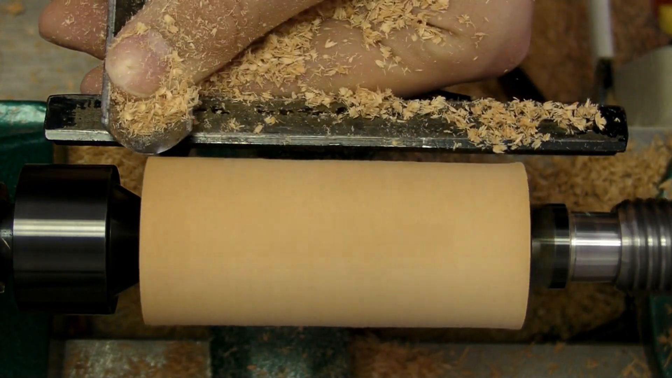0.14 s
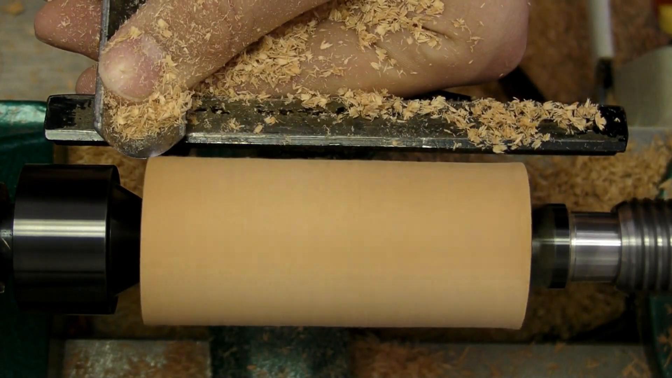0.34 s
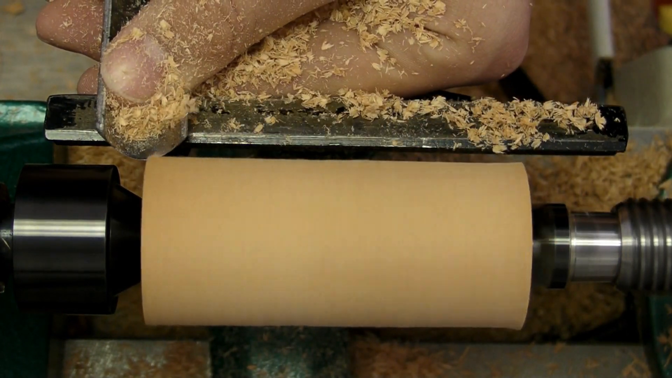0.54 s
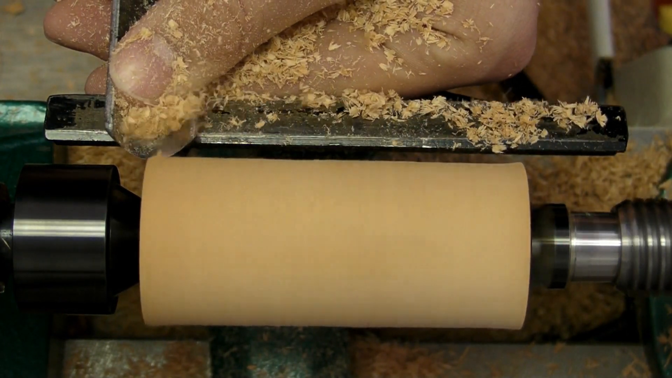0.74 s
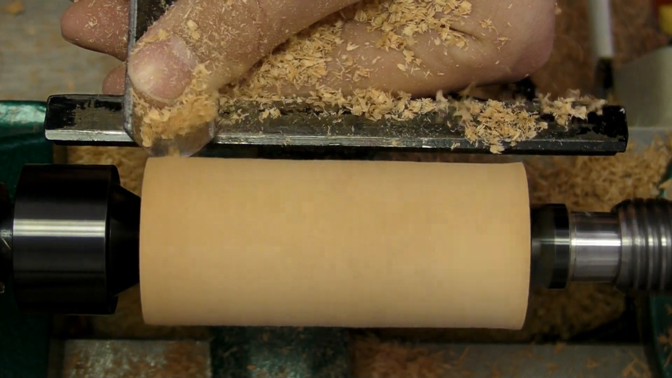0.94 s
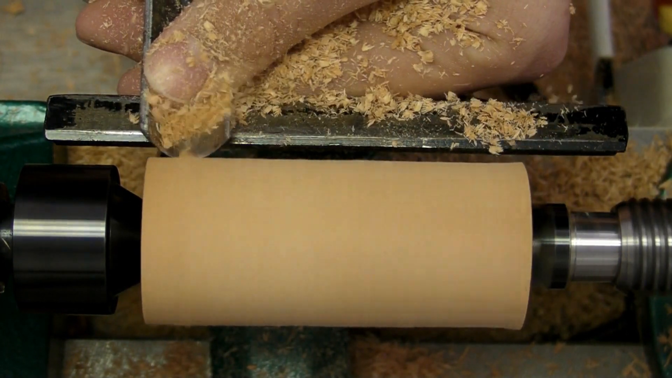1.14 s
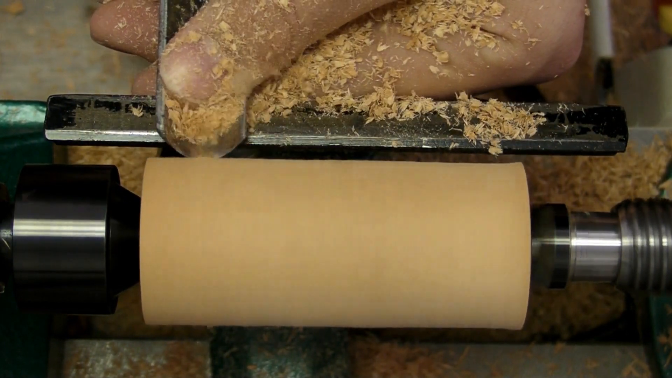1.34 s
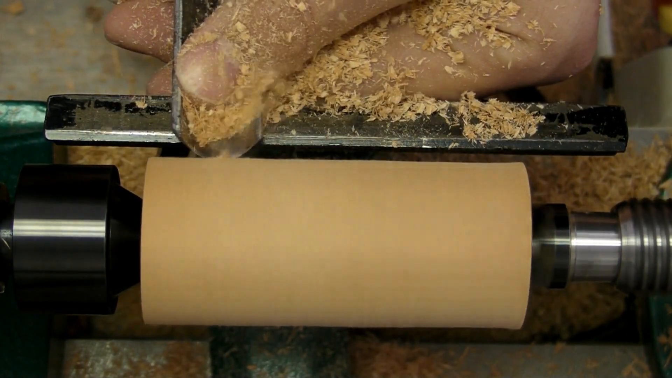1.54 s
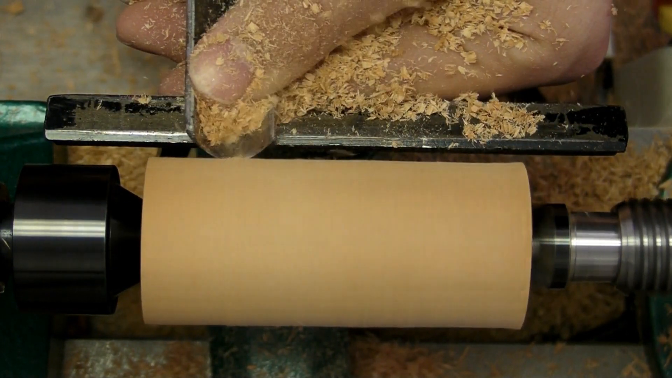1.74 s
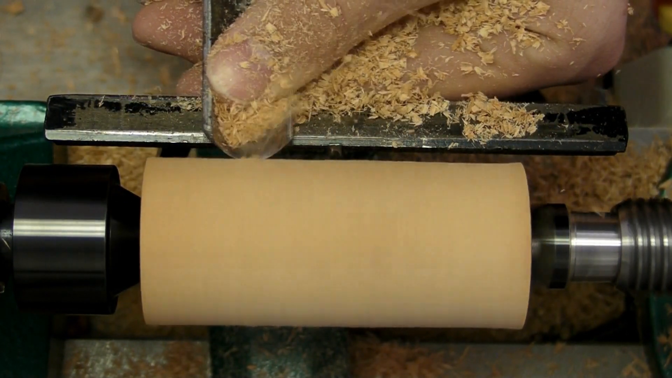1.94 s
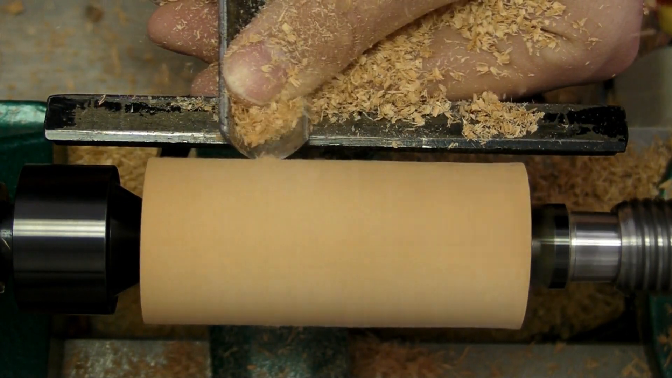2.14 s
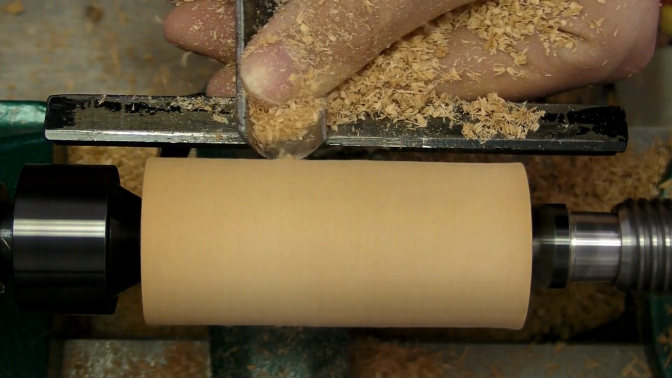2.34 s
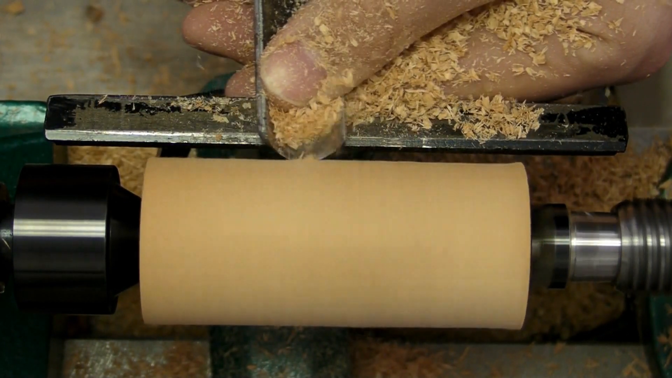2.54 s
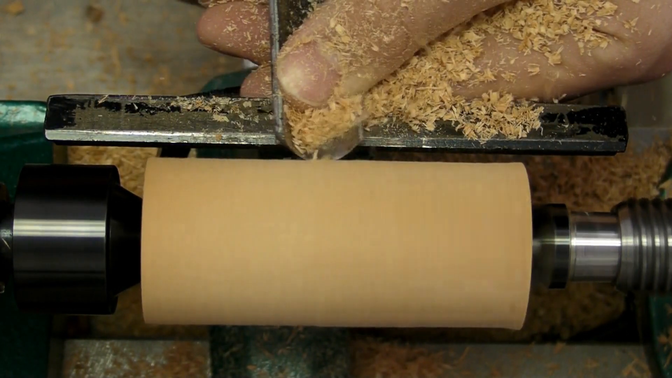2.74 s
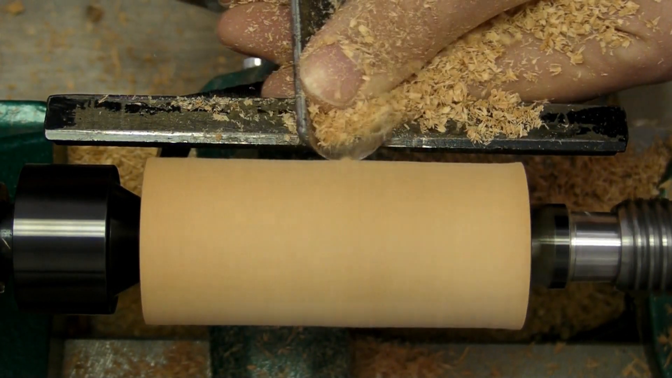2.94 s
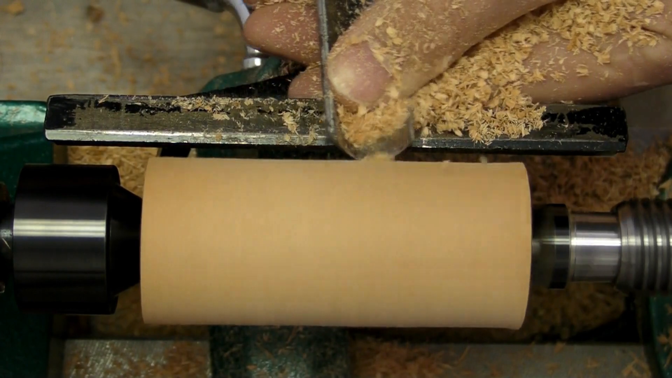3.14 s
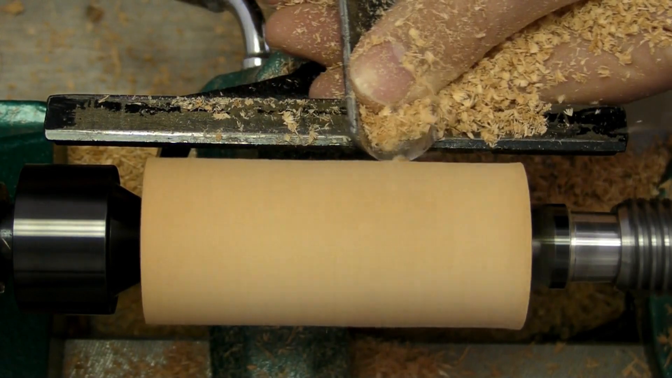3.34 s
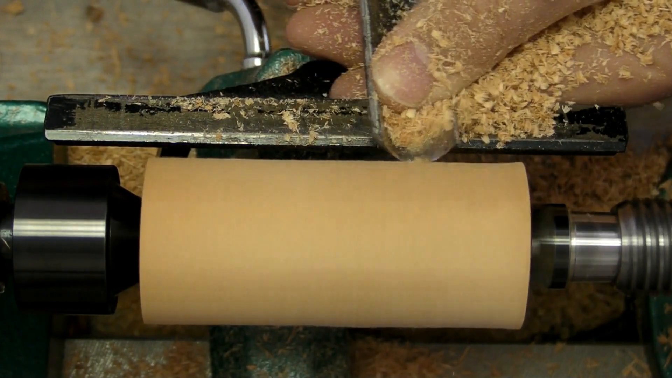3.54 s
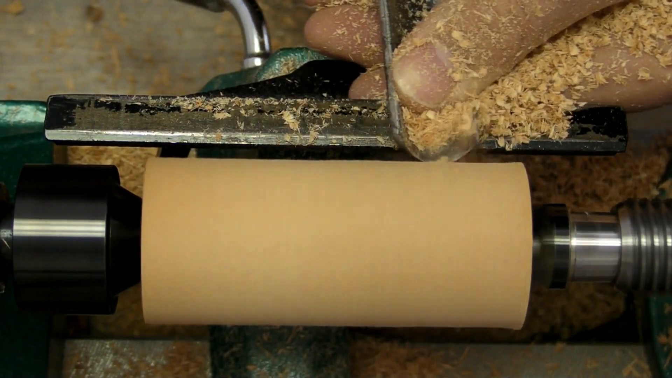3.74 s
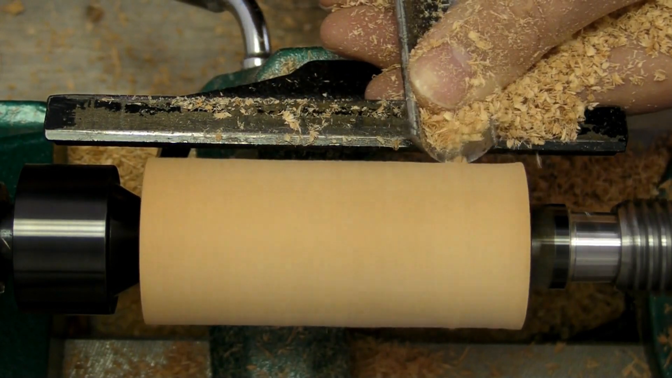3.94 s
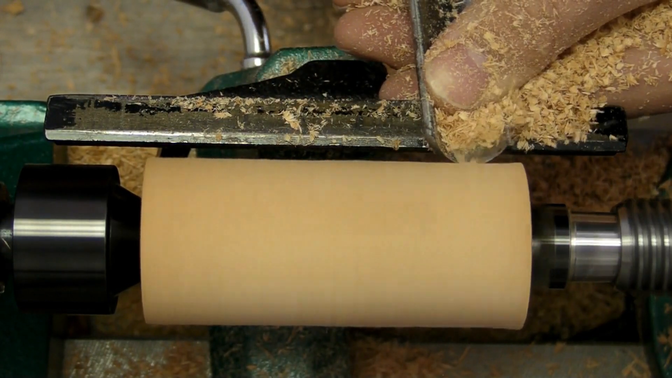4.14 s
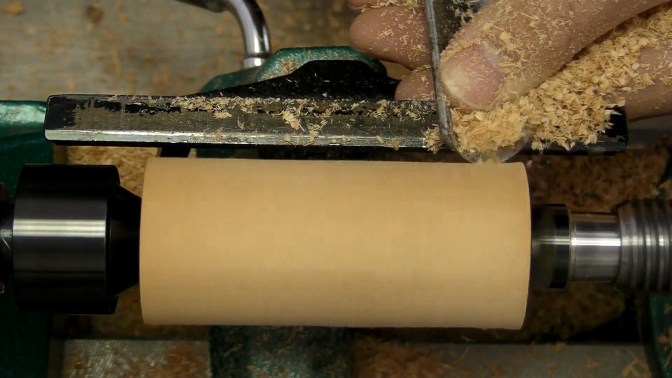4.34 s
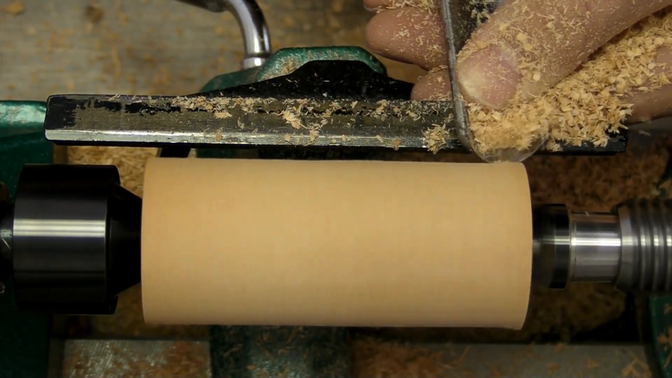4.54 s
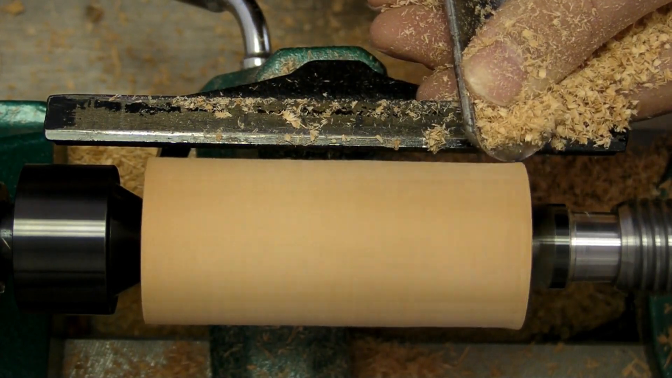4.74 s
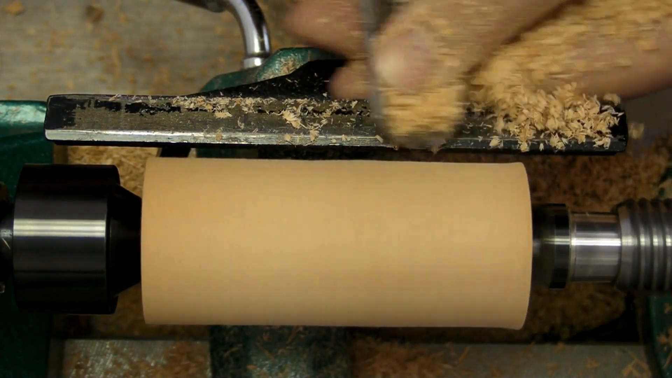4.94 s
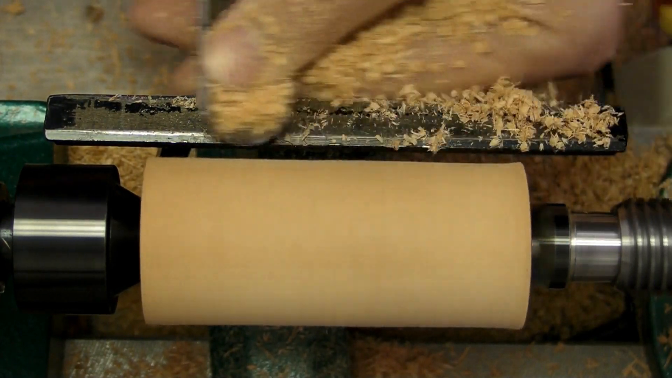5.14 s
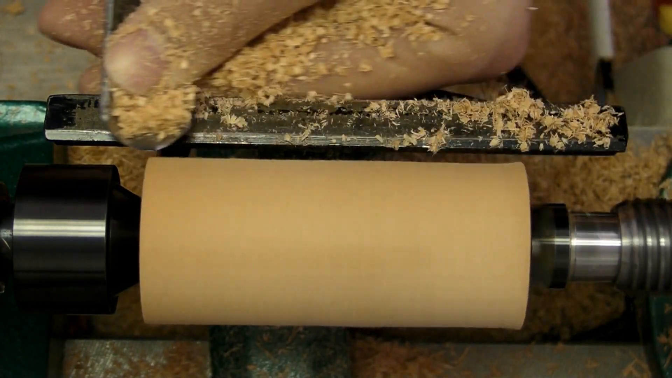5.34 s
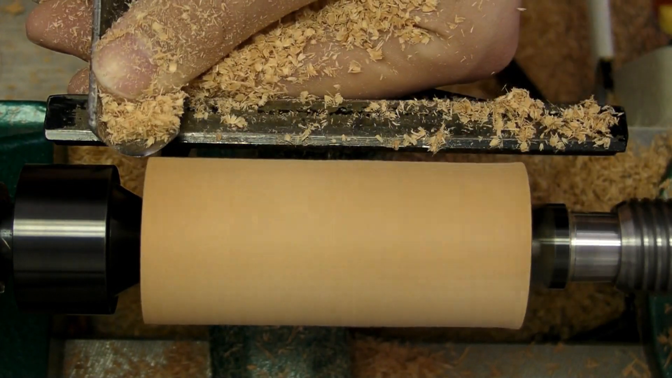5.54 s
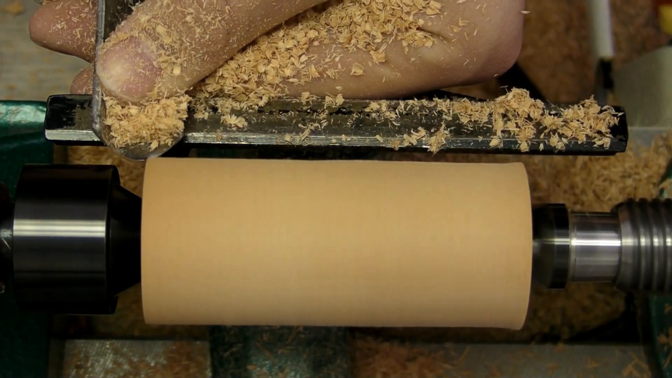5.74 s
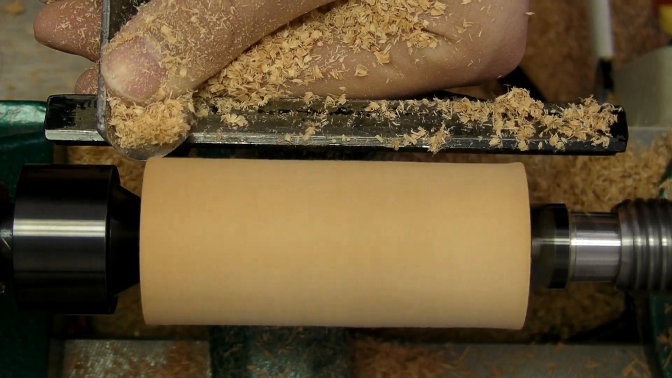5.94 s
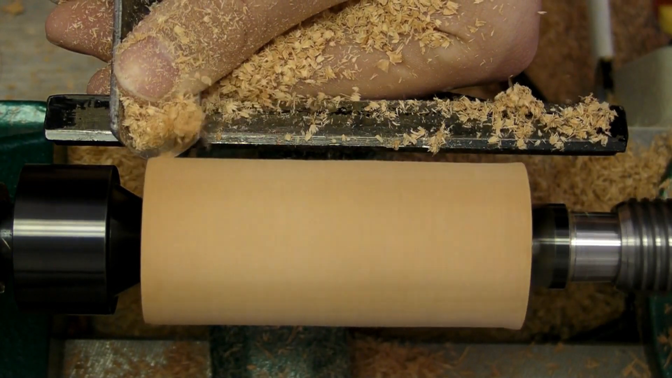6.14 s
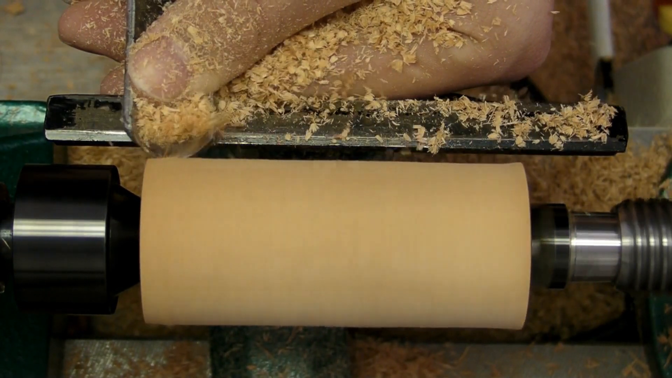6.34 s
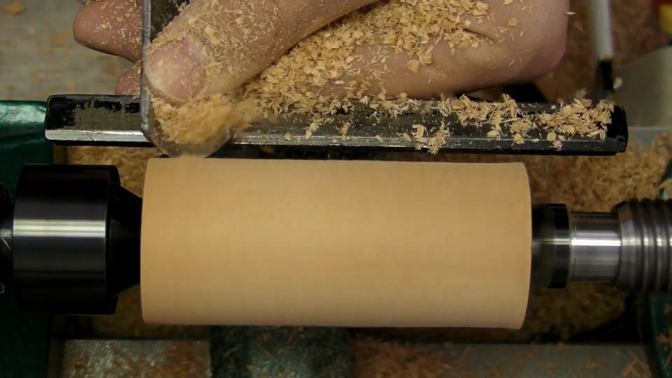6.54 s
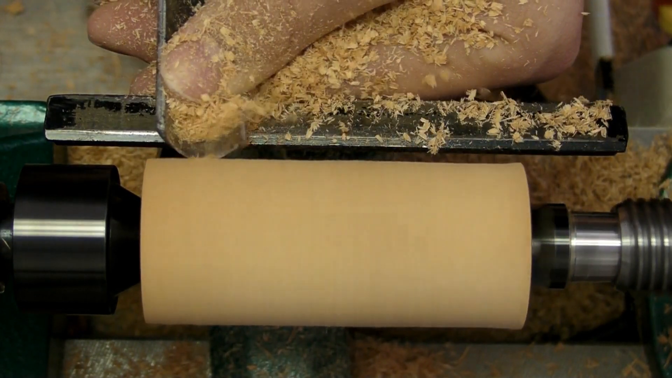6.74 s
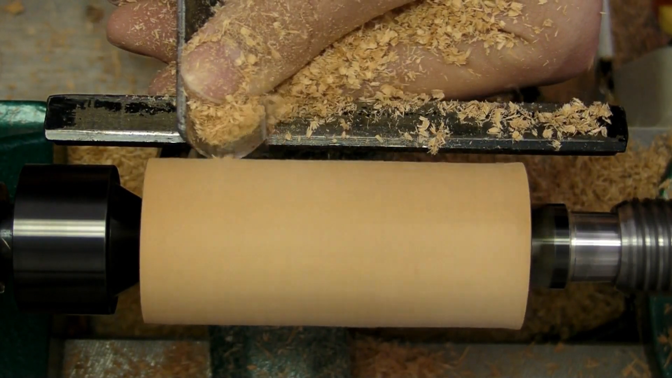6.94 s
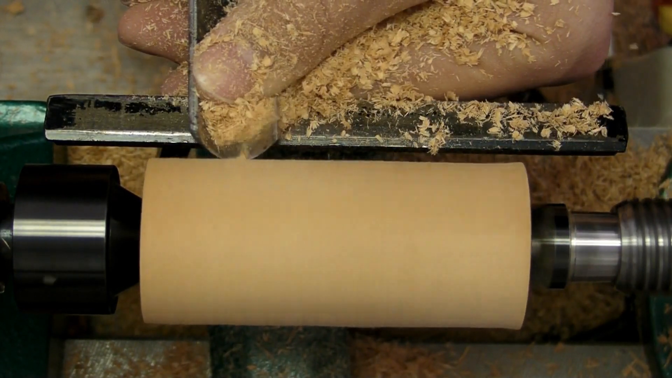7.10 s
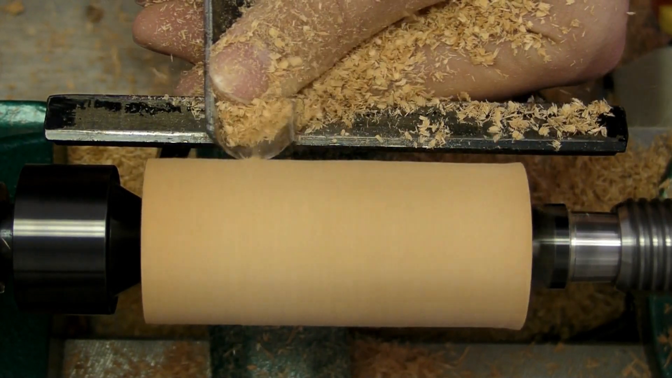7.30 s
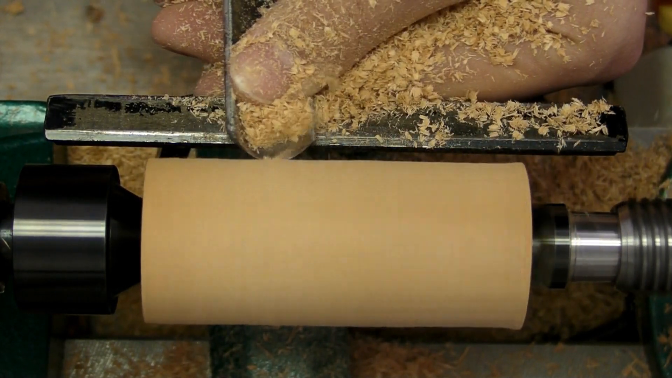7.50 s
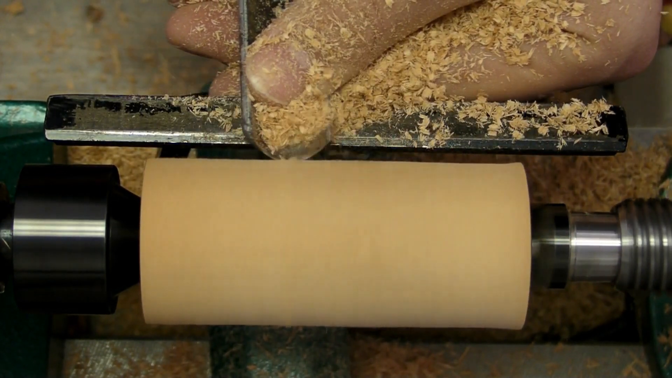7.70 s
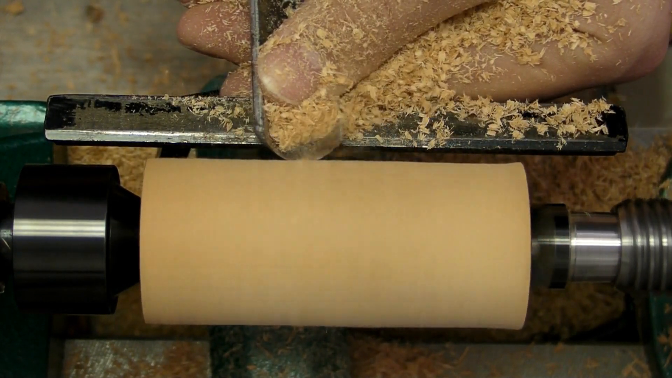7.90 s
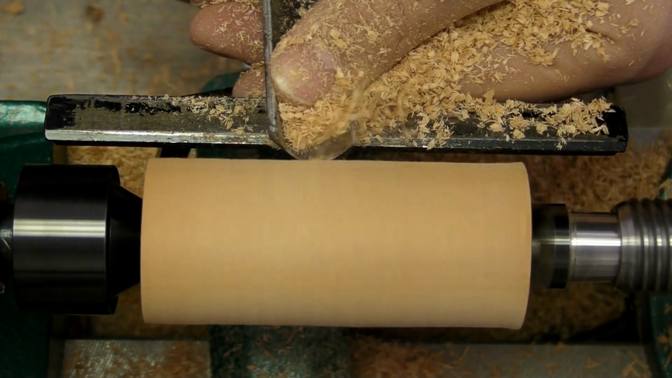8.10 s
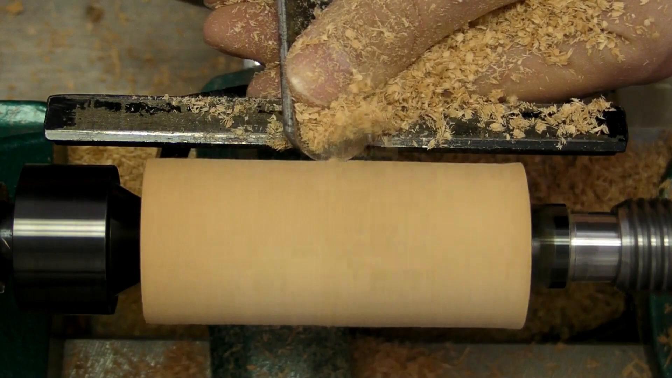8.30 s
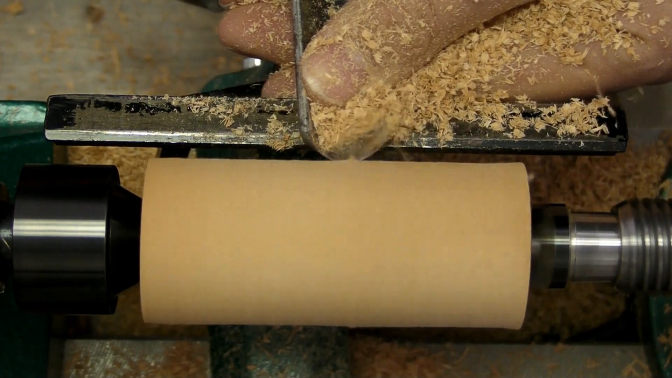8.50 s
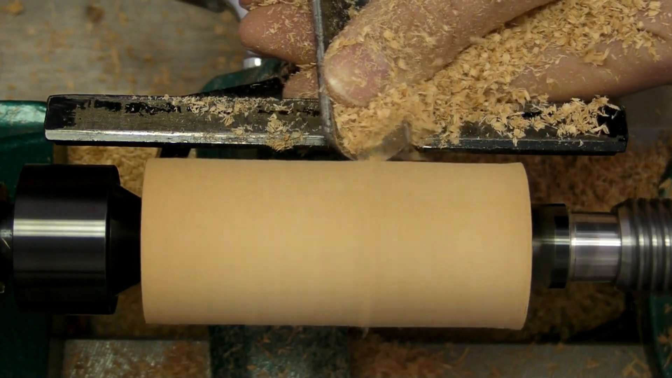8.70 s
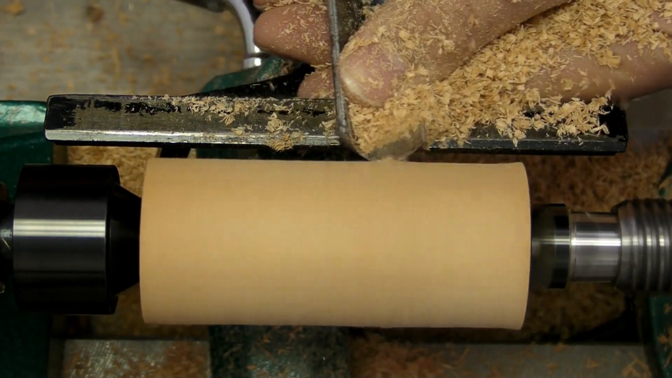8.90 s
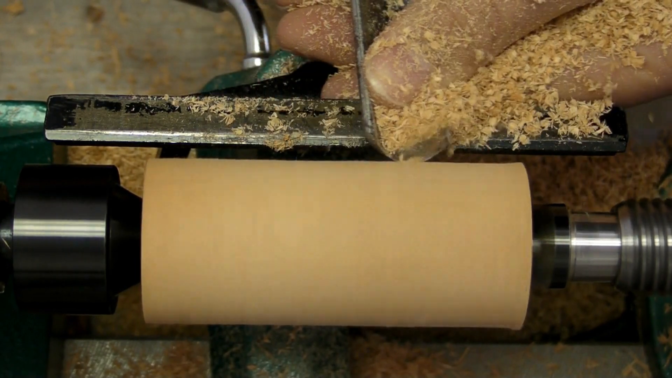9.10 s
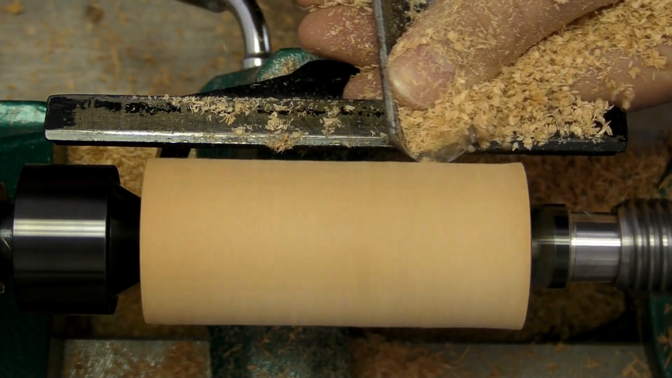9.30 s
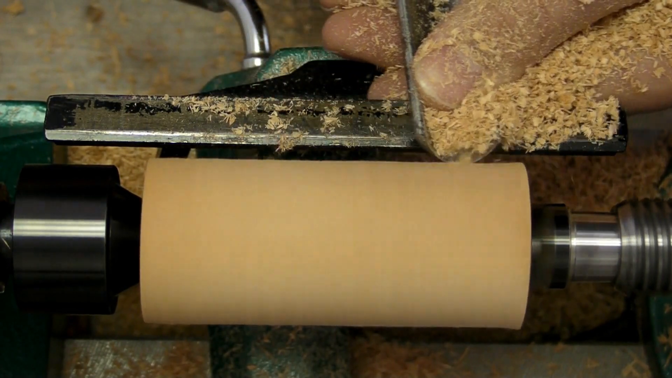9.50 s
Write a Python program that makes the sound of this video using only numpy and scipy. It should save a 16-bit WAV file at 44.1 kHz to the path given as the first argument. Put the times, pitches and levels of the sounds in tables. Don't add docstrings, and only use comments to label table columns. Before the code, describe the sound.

At first only a small lathe runs: a low-level, unsteady motor hum with airy wash and light housing rattle, throbbing about ten times a second. At 0.5 s a gouge abruptly bites the spinning wooden blank, and a loud, dense rasp takes over, bright hiss mixed with gritty crackle and hard metallic buzzing, fluttering about eighteen times a second with the turns. The spin sags slightly at the bite and recovers; the timbre wavers and shifts as the tool moves along. At about 4.7 s it lifts quickly, leaving the quiet motor. Around 5.1 s a tight cluster of steel knocks sounds on the rest, the last one hardest. At about 5.9 s the edge bites again with a stronger jolt, and the rasp continues to the end, around 9.6 s, uninterrupted. Close stereo microphone, slightly overloaded, short workshop echo.

```python
import sys
import numpy as np
from scipy import signal
from scipy.fft import rfft, irfft
from scipy.io import wavfile
from scipy.ndimage import uniform_filter1d, map_coordinates

SR = 44100
rng = np.random.default_rng(int(sys.argv[2]) if len(sys.argv) > 2 else 0)


def dump_mix(stems):
    frames = np.atleast_2d(stems).T
    limited = np.clip(frames, -1, 1)
    pcm = np.round(limited * 32767).astype(np.int16)
    wavfile.write(sys.argv[1], SR, pcm)


def invert_db(level):
    return 10 ** (np.asarray(level, dtype=float) / 20)


N = 426006
TIME = np.arange(N) / SR
HZ = np.fft.rfftfreq(8192, 1 / SR)


def evened(x):
    return x / np.sqrt(np.mean(x ** 2) + 1e-20)


def read(points, hz):
    f, value = np.transpose(points)
    return np.interp(np.log(hz + 1), np.log(f + 1), value)


def curve(points):
    return np.interp(TIME, *np.transpose(points))


def causal(gain):
    cepstrum = irfft(np.log(gain + 1e-6))
    cepstrum[1:len(gain) - 1] *= 2
    cepstrum[len(gain):] = 0
    return irfft(np.exp(rfft(cepstrum)))[:len(gain)]


def body(modes, broad_db):
    power = invert_db(2 * broad_db)
    for hz, width, db in modes:
        detuning = 2 * (HZ ** 2 - hz ** 2) / (2 * HZ + 1) / width
        power = power + invert_db(2 * db) / (1 + detuning ** 2) ** 1.57
    return np.sqrt(power)


def flicker(hz):
    steps = rng.standard_normal(int(N / SR * 2 * hz) + 2)
    smooth = signal.resample(steps, 16 * len(steps))
    return np.interp(TIME, np.linspace(0, N / SR, len(smooth)), evened(smooth))


def widen(mid, spread):
    taps = rng.choice([-1., 1.], (2, 1200)) * np.exp(-np.arange(1200) / 280.0)
    tone = causal(invert_db(read(spread, HZ)))
    smear = signal.oaconvolve(taps / np.linalg.norm(taps[0]), tone[None], axes=1)
    first, second = signal.oaconvolve(mid[None], smear, axes=1)[:, :N]
    angle = 2 * np.pi * 1.5 * TIME + 2.0 * flicker(12.0)
    side = first * np.cos(angle) + second * np.sin(angle)
    return np.array([invert_db(-0.2) * mid + side, invert_db(0.15) * mid - side])


# (frequency [Hz], level per Hz [dB])
MOTOR_WASH = [(15, -38), (25, -80), (64, -9), (277, -2.5), (301, -10), (427, -1), (463, -11), (624, -16),
              (695, -14), (911, -1), (988, -10.5), (2910, -8), (16000, -23)]
# (frequency [Hz], width [Hz], level [dB])
HOUSING = [(485, 160, -4.5), (952, 28, 0.5), (1174, 99, -5), (1890, 22, -3), (2280, 55, -2.5),
           (2510, 45, -5), (2930, 98, -3.5), (3650, 49, -4.5), (4410, 70, -16), (7600, 190, -16)]
# (frequency [Hz], level [dB])
HUM = [(312.2, -57.5), (393.0, -58), (463.0, -53.5), (619.1, -58), (775.2, -60), (893.6, -54), (931.3, -53),
       (1055, -69), (1200, -63)]


def motor():
    belt = 2 * np.pi * 9.65 * (TIME - 5.505)
    belt_db = 2.5 * np.cos(belt) + 2.0 * np.cos(2 * belt) + 1.2 * flicker(40)
    noise = rng.standard_normal(N)
    wash = evened(signal.oaconvolve(noise, causal(invert_db(read(MOTOR_WASH, HZ))))[:N])
    blows = rng.standard_normal(N) * invert_db(0.12 * belt_db)
    rattle = evened(signal.oaconvolve(blows, causal(body(HOUSING, -45 + 0 * HZ)))[:N])
    drift = np.cumsum(1 + 0.00068 * flicker(2.7)) / SR
    tones = np.zeros(N)
    for hz, db in HUM:
        level = invert_db(db + belt_db * (hz > 850) + 1.6 * flicker(23))
        tones += level * np.sqrt(2) * np.sin(2 * np.pi * (hz * drift + rng.random()))
    return invert_db(-41.5) * (invert_db(-2.5) * wash + invert_db(-5.0) * rattle) + tones


# (frequency [Hz], time to fall by 60 dB [s])
SHOP = [(200, 0.54), (1000, 0.56), (4000, 0.37), (12000, 0.11)]


def shop(x):
    taps = np.zeros((2, SR // 2))
    at = np.arange(300, SR // 2 - 20, 20) + rng.integers(0, 20, (2, (SR // 2 - 301) // 20))
    np.put_along_axis(taps, at, rng.choice([-1., 1.], at.shape), 1)
    hz, t, z = signal.stft(taps, SR, nperseg=256)
    tail = signal.istft(z * invert_db(-60 * t / read(SHOP, hz)[:, None]), SR, nperseg=256)[1]
    return signal.oaconvolve(x[None], tail / np.linalg.norm(tail[0]), axes=1)[:, :N]


# (time [s], peak level [dB], pitch [Hz])
KNOCKS = [
    (5.0913, -23, 3470),
    (5.1143, -27, 3440),
    (5.1214, -25, 1250),
    (5.1322, -15.5, 3460),
]
# (frequency [Hz], level [dB], time to fall by 60 dB [s])
STEEL = [(1250, 6.5, 0.14), (2000, -4, .04), (2960, -6, .05), (3460, 6, .03), (3760, -8, .04)]


def knocks():
    out, t = np.zeros(N), np.arange(5000) / SR
    scrape_band = signal.butter(3, [1000, 3900], "band", fs=SR)
    for s, db, hz in KNOCKS:
        ring = 0
        for f, level, t60 in STEEL:
            off_pitch_db = 4.3 * abs(np.log2(f / hz))
            ring = ring + invert_db(level - off_pitch_db - 60 * t / t60) * np.sin(2 * np.pi * f * t)
        scratch = rng.standard_normal(len(t)) * (np.exp(-t / 0.0023) + 0.38 * np.exp(-t / 0.022))
        scratch = signal.lfilter(*scrape_band, scratch)
        out[round(s * SR):][:len(t)] += invert_db(db - 3.0) * (ring / abs(ring).max() + 0.81 * scratch)
    return out


# (edge touches [s], edge bites [s], gouge lifts or would lift [s], jolt of the bite [dB])
PASSES = [
    (0.476, 0.501, 4.735, 5),
    (5.847, 5.875, 10.6, 8),
]


def travel():
    _, bite, lift, *_ = np.transpose(PASSES)
    return np.interp(TIME, np.c_[bite, lift].ravel(), np.tile([0, 1], len(bite)))


def contact_db(lag_s, ring_db_per_s, jolt_share):
    jolt_s = .004
    out = np.full(N, -90.)
    for touch, bite, lift, jolt_db in PASSES:
        times = [touch - .018, touch - .002, touch, bite - 2 * jolt_s, bite]
        graze = np.interp(TIME - lag_s, times, [-45, -33, -16, -7, 0], left=-90)
        jolt = jolt_share * jolt_db * np.exp(-((TIME - bite) / jolt_s) ** 2)
        out = np.maximum(out, graze + jolt - ring_db_per_s * np.maximum(TIME - lift, 0))
    return out


# (time [s], speed [turns/s])
SPINDLE = [(.5, 18.25), (.65, 18.1), (.92, 17.3), (1.35, 17.77), (1.75, 17.75), (2.5, 17.97), (3.1, 17.9),
           (4.75, 17.98), (5.87, 18.1), (6.22, 17.5), (6.5, 17.72), (7.0, 17.9), (7.6, 17.88), (8.0, 17.78),
           (8.7, 17.66), (9.1, 18.05)]


def spindle_turns():
    return -.245 + np.cumsum(curve(SPINDLE)) / SR


STATIONS = (0, .7, 1)
# (level [dB]), then (angle [turns])
OFF_CENTRE_DB = (1.3, 1.1, 2.8)
OFF_CENTRE_TURNS = (-.27, -.2, -.17)
# (level [dB]), then (angle [turns])
OVAL_DB = (1.6, .6, 1.1)
OVAL_TURNS = (.03, .25, .3)
FLATS_DB = (4, 1.5, 4)


def throb(turns, done):
    shape = (OFF_CENTRE_DB, OFF_CENTRE_TURNS, OVAL_DB, OVAL_TURNS, FLATS_DB)
    centre_db, centre_at, oval_db, oval_at, flats_db = (np.interp(done, STATIONS, c) for c in shape)
    centre = centre_db * np.cos(2 * np.pi * (turns + centre_at))
    oval = oval_db * np.cos(2 * np.pi * (2 * turns + oval_at))
    flats = np.cos(2 * np.pi * 4 * turns) + 0.57 * np.cos(2 * np.pi * (8 * turns - .45))
    return centre + oval + 0.61 * flats_db * flats


# (count [per turn], level [dB])
RIDGES = [(8, 11), (14, 11), (16, 3), (20, 6.5), (22, 12), (24, 2.5), (27, 6), (30, 7), (32, 8), (36, 8.5),
          (41, 6), (46, 2), (53, 5)]


def surface(turns):
    order = np.arange(513)
    strength_db = np.where(order % 2, -3.0, 0.) - 60 * (order > 130)
    rings = rng.standard_normal((60, 513)) + 1j * rng.standard_normal((60, 513))
    rings = rings * invert_db(strength_db)
    for count, db in RIDGES:
        phase = count ** 2 + .22 * np.cumsum(rng.standard_normal(60))
        rings[:, count] = .5 * rings[:, count] + invert_db(db) * np.exp(1j * phase)
    profile = irfft(rings, axis=1)
    profile = np.c_[profile, profile[:, :1]]
    return evened(map_coordinates(profile, [TIME * 3.5, turns % 1 * 1024], order=1))


# (time [s], edge hiss from its pressure [dB], slack that lets the gouge bounce [dB])
HAND = [(.5, -18, -4), (.8, -18, 5), (1.2, -19, 0), (1.47, -18.5, -3), (1.65, -18.6, 6.5), (2.2, -18.5, -4),
        (2.66, -18.7, -7.5), (3.35, -19, 3.5), (4.0, -19, 0.5), (4.55, -18, -3), (4.72, -20, 4),
        (5.9, -17.5, -1.5), (6.5, -19, 1), (7.0, -18.5, -7), (7.4, -18.5, -7), (8.2, -18, 0),
        (8.9, -18.5, -8.5), (9.66, -18.5, 3)]
# (travel [0-1], rest [dB], bed [dB], shank [dB])
ALONG = [(0, -14, -5.5, -2.5), (.15, -15, -7.5, -1), (.3, -18.5, -8, -0.5), (.55, -16, -8, -1.1),
         (.68, -10.5, -5, -1.5), (.85, -11.5, -5.5, -6), (1, -23, -8.5, -7)]
THUD_DB = (-20, -21)
HISS_SPLIT_DB = (-0.5, -3)


def band_levels_db(place, done):
    s, *hand = np.transpose(HAND)
    at, *parts_db = np.transpose(ALONG)
    hiss_db, slack_db = (np.interp(TIME, s, db) for db in hand)
    thud_db = np.interp(place, [0, 1], THUD_DB)
    rest_db, bed_db, shank_db = (np.interp(done, at, db) for db in parts_db)
    levels_db = [thud_db, rest_db + slack_db, bed_db, shank_db, *HISS_SPLIT_DB]
    return [hiss_db + db for db in levels_db]


# (time [s], place [0 drive end - 1 tail end])
PLACE = [
    (0, 0.056),
    (2.7, 0.3),
    (3.7, 0.77),
    (4.3, 0.77),
    (4.8, 0.78),
    (5.5, 0.093),
    (8.6, 0.37),
    (9.4, 0.87),
    (9.66, 1),
]
# (frequency [Hz], width [Hz], level [dB])
DRIVE_END = [(410, 44, 3.5), (671, 31, -4), (919, 69, -13.5), (1208, 91, -9), (1502, 59, -15.5),
             (2450, 5.7, -19.5), (2674, 63, -9.5), (2940, 102, -2.0), (3738, 51, -10.5), (4574, 37, -10.5),
             (4690, 64, -9), (5620, 290, -14), (6820, 310, -4), (7540, 102, -4), (8110, 90, -38),
             (10290, 350, -9.0), (11580, 210, -10), (7090, 300, -0.5), (507, 13.3, -0.5), (369, 59, 10.5),
             (7310, 105, -9), (9570, 740, -9)]
# (frequency [Hz], width [Hz], level [dB])
TAIL_END = [(384, 42, -6.0), (833, 185, -5), (1090, 58, -4.5), (1350, 98, -7), (1645, 176, -4),
            (1833, 21, -5.5), (2474, 90, -10.5), (2220, 89, -13.5), (3854, 25, -7.5), (3500, 110, -31),
            (4410, 120, -9), (5270, 32, -22), (5700, 57, -36), (6780, 96, -1.5), (7680, 130, 1.5),
            (8190, 160, -29), (8900, 300, -10.5), (10200, 160, -2.5), (11460, 360, -11), (7210, 200, -6),
            (590, 170, -7.5), (97, 23, -30), (216, 82, -6.5)]
# (frequency [Hz], level [dB])
BETWEEN = [(30, -78), (90, -26.5), (300, -12.5), (1500, -21.5), (3200, -20.5), (5000, -20), (7700, -19),
           (8300, -18), (11000, -15), (12500, -20), (13000, -14.5), (13500, -20), (15100, -13),
           (15500, -32)]
BAND_EDGES_HZ = [300, 460, 2200, 4000, 8000]
START_LAG_S = (0.017, 0.0065, 0.0097, 0, 0.0041, 0)
RING_ON = (500, 260, 190, 800, 756, 754)
JOLT_SHARE = (0, 0, 0, .2, 1, .6)


def cut():
    done, turns = travel(), spindle_turns()
    throb_db = throb(turns, done)
    hand_db = 0.14 * flicker(24) + 1.0 * flicker(110)
    place = np.clip(curve(PLACE), 0, 1)
    levels_db = band_levels_db(place, done)
    ends = [body(DRIVE_END, read(BETWEEN, HZ) - 1.0), body(TAIL_END, read(BETWEEN, HZ) + 3.0)]
    lows = [0 * HZ] + [1 / (1 + (HZ / edge) ** 16) for edge in BAND_EDGES_HZ] + [1 + 0 * HZ]
    ridges, out = surface(turns), np.zeros(N)
    fibres = rng.standard_normal(N) * (rng.random(N) < 14000 / SR)
    size = np.minimum(rng.exponential(1, N), 5)
    # share of ridges, depth of the throb, own flicker [dB], spread of snap sizes [dB]
    bands = [(0.37, 0.27, 0.62, 0.94), (0.26, 0.68, 3.9, 1.5), (0.35, 0.51, 1.44, 2.4),
             (0.0, 0.73, 2.5, 1.26), (0, 1.34, 2.14, 1.15), (0.065, 1.27, 2.3, 1.9)]
    for k, (share, depth, own_db, size_db) in enumerate(bands):
        snaps = evened(np.roll(fibres * invert_db(size_db * size), 5000 * k))
        swell = evened(invert_db(depth * (throb_db + hand_db) + own_db * flicker(110)))
        drive = (share * ridges + np.sqrt(1 - share ** 2) * snaps) * swell
        window = np.sqrt(lows[k + 1] - lows[k] + 1e-9)
        rings = np.array([causal(end * window) for end in ends])
        rings /= np.linalg.norm(rings, axis=1)[:, None]
        at_drive, at_tail = signal.oaconvolve(drive[None], rings, axes=1)[:, :N]
        band = (1 - place) * at_drive + place * at_tail
        band /= np.sqrt(uniform_filter1d(band ** 2, 9000) + 1e-9)
        out += band * invert_db(levels_db[k] + contact_db(START_LAG_S[k], RING_ON[k], JOLT_SHARE[k]))
    wavering = np.arange(N) + np.cumsum(0.0036 * flicker(50) + 0.0027 * throb_db)
    return map_coordinates(out, [wavering], order=2, prefilter=False)


# (frequency [Hz], level [dB])
TOOL_SPREAD = [(60, 1), (100, -20), (180, -15), (310, -21.5), (550, -18), (950, -13), (1650, -10),
               (2860, -12), (4970, -3.5), (8640, -6.5), (15000, 0.5)]
# (frequency [Hz], level [dB])
MOTOR_SPREAD = [(60, -7), (180, -9), (550, -13.5), (1650, -12), (4970, -3), (15000, 0)]


def scene():
    tool = cut() + knocks()
    room = shop(tool)
    near = widen(tool, TOOL_SPREAD) + invert_db(-12.5) * (room + 0.76 * room[::-1])
    near = signal.sosfilt(signal.butter(4, 65, "high", fs=SR, output="sos"), near)
    ducking_db = -6.0 * np.clip(uniform_filter1d(abs(tool), 6000) / 0.4, 0, 1)
    return near + invert_db(ducking_db) * widen(motor(), MOTOR_SPREAD)


def low_pass(x):
    return signal.sosfilt(signal.butter(12, 16410, fs=SR, output="sos"), x)


def record(dry):
    notch_hz, limit_hz = 7880, 15700
    notch = 1 - .97 / (1 + ((HZ - notch_hz) / 36.0) ** 4)
    path = notch / (1 + (HZ / limit_hz) ** 200)
    overloaded = .75 * np.tanh(dry / .75)
    heard = signal.oaconvolve(overloaded, causal(path)[None], axes=1)[:, :N]
    return low_pass(heard)


dry = scene()
out = record(dry)
dump_mix(out)
```